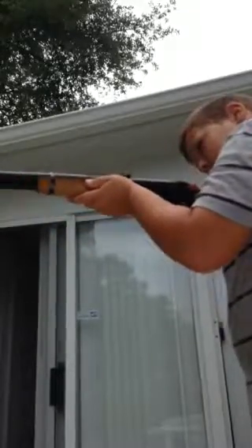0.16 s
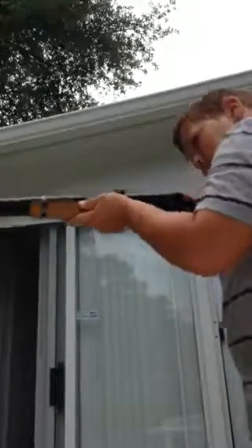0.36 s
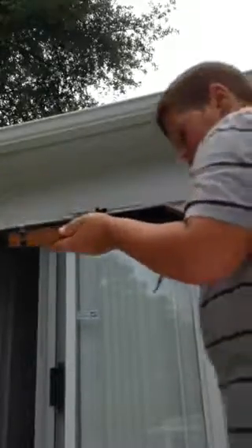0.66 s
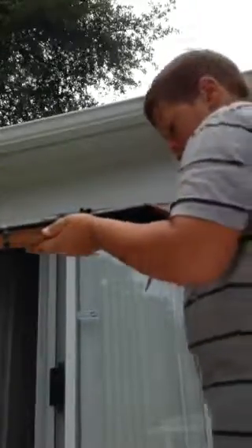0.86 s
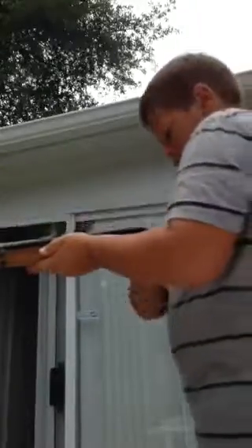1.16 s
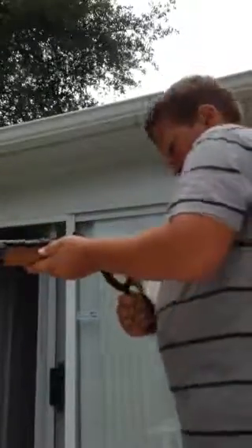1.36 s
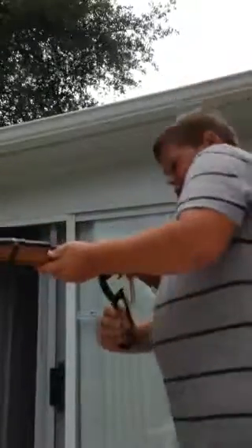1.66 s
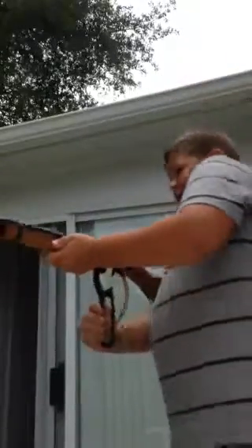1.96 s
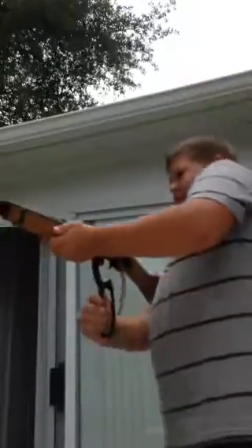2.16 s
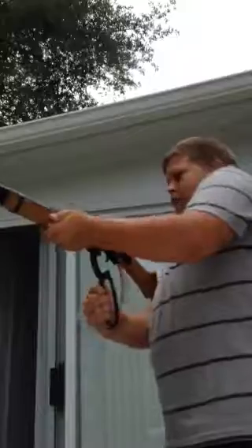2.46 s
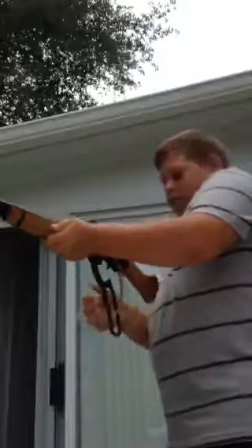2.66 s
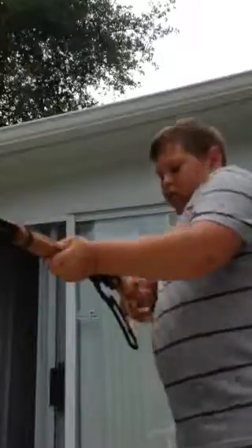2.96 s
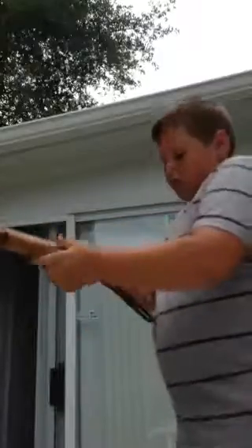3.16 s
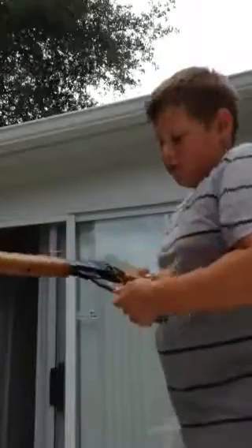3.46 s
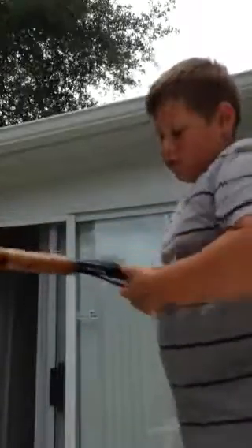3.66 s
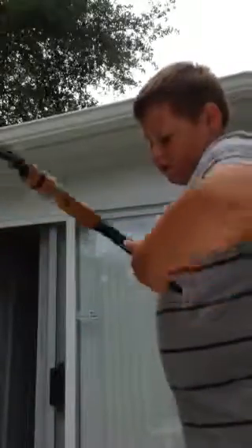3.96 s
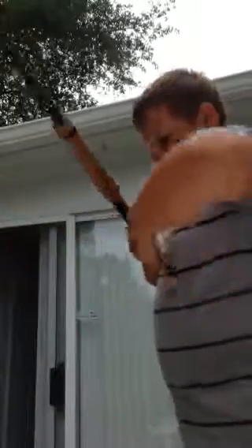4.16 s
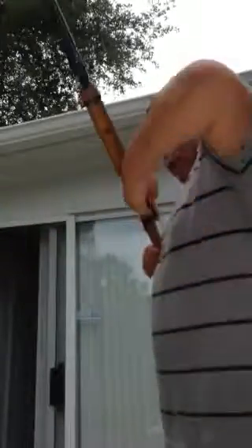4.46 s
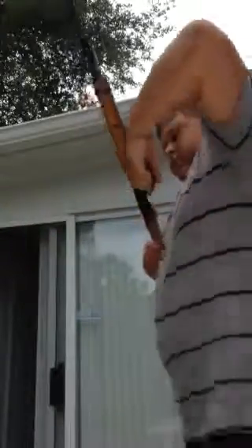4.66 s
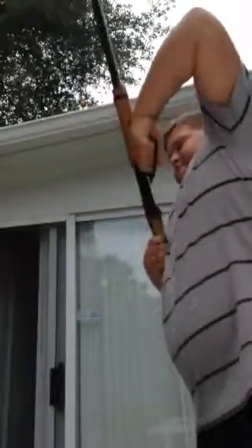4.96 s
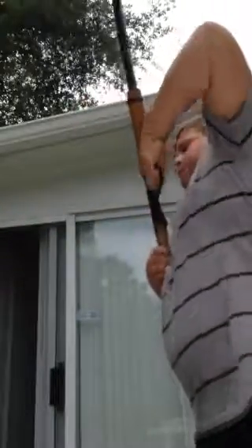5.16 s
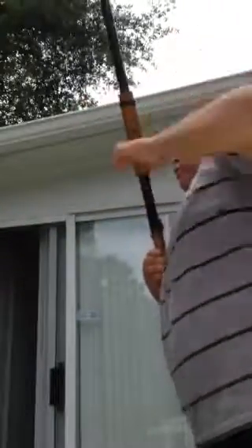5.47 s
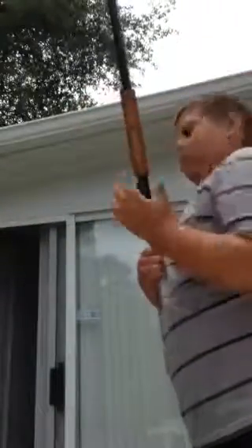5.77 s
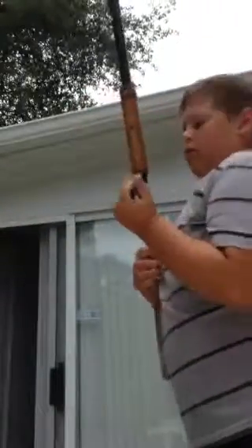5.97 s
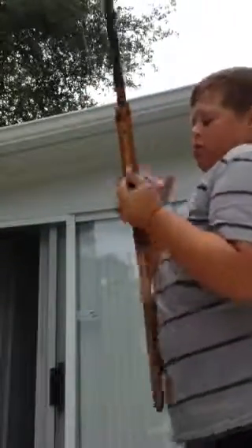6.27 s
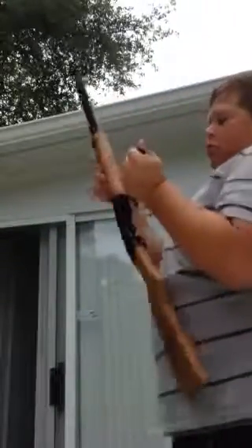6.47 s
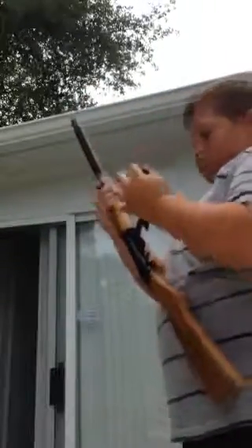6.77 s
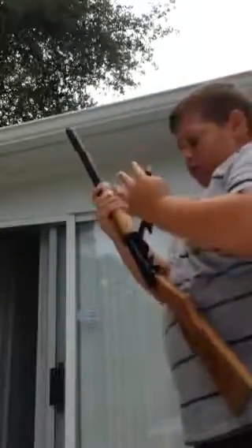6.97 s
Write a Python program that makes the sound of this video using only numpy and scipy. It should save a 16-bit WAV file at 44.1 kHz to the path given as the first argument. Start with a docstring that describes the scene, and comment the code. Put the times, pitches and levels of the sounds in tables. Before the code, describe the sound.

A BB rifle is handled close to the microphone beside a house wall. Small pellets tick and trickle, then a hard double steel crack and another follow. After a quieter spell come a bright rattle, a knock, then three strong clacks amid rushing pellets. Light ticks and handling knocks finish. Short wall echoes follow; faint air, low hum, insects and a far bird lie beneath.

```python
"""Sharp cracks come from the spring action of a lever-action BB rifle, worked and fired beside a house wall.
Each crack is a burst of steel chatter that rings the gun's modes and bounces once.
Loose BBs roll and tick in the steel barrel tube as streams of small hits; lever and hands knock on the stock.
Wall and eaves throw the gun's sounds back as fading noise echoes.
Behind it are filtered noise for air, a humming machine and insects, and gliding tones for a far bird."""
import sys
import numpy as np
from scipy import signal
from scipy.fft import rfft, irfft
from scipy.io import wavfile

SR = 44100
rng = np.random.default_rng(int(sys.argv[2]) if len(sys.argv) > 2 else 0)


def log_audio(samples):
    """Write samples as a 16-bit WAV file to the path given in sys.argv[1]."""
    # one column per channel
    frames = np.atleast_2d(samples).T
    # limit to full scale, then quantise
    limited = np.clip(frames, -1, 1)
    pcm = np.round(limited * 32767).astype(np.int16)
    wavfile.write(sys.argv[1], SR, pcm)


N = 313992
TIME = np.arange(N) / SR  # seconds

# Bouts of rolling, each with the tube resonances that the pile of BBs leaves free.
# Each row: start in seconds, end in seconds, basic hits per second,
# lower resonance in Hz, its boost in dB, upper resonance in Hz, its boost in dB.
BOUTS = [(.5, 1.597, 5100, 4430, 5.5, 12060, 8.5), (1.6, 3.1, 3900, 3650, 2.5, 11500, -2.5),
         (3.11, 3.99, 2700, 3370, 10, 6860, 6), (4, 5.0, 3400, 7000, 1.5, 11700, 4),
         (5.0, 6.003, 2200, 2680, -0.5, 7040, 1.5), (5.997, 7.203, 1400, 2450, -2.5, 5960, 5)]
# The colour of a BB's hit. Each row: frequency in Hz, relative level in dB.
BALL = [(300, -37), (1500, -45), (2600, -24), (3600, -7), (5500, -0.5), (8000, 0.5), (10000, 3.5),
        (12200, 10), (15500, 5.5)]


def amp(db):
    """Turns decibels into a gain."""
    return 10 ** (np.asarray(db) / 20)


def unit(x):
    """Scales a signal to an rms (average strength) of 1."""
    return x / np.sqrt(np.mean(abs(x) ** 2) + 1e-20)


def read(points, hz):
    """Reads a curve between its points, along a log-frequency axis."""
    f, value = np.transpose(points)
    return np.interp(np.log(hz + 1), np.log(f), value)


def add(mix, s, sound):
    """Mixes a sound in, starting s seconds into the mix."""
    part = mix[round(s * SR):][:len(sound)]
    part += sound[:len(part)]


def bins(size=2048):
    """Lists the frequencies of a short spectrum, moved up 1 Hz to avoid zero."""
    return np.fft.rfftfreq(size, 1 / SR) + 1


def hump(centre_hz, octaves):
    """Makes a bell-shaped bump over log frequency, with a peak of 1."""
    distance = np.log2(bins() / centre_hz) / octaves
    return np.exp(-.5 * distance ** 2)


def ring(gain):
    """Turns a spectrum into a ringing of energy 1 that starts at once and never before the blow."""
    cepstrum = irfft(np.log(np.maximum(gain / gain.max(), 1e-5)))
    # folding the cepstrum forward in time gives the minimum-phase response
    half = len(cepstrum) // 2
    cepstrum[1:half] *= 2
    cepstrum[half + 1:] = 0
    response = irfft(np.exp(rfft(cepstrum)))
    return response / np.linalg.norm(response)


def coloured(x, points):
    """Filters a sound by a spectrum given in dB."""
    gain = amp(read(points, bins()))
    return signal.fftconvolve(x, ring(gain) * np.sqrt(np.mean(gain ** 2)))


def noise(gain_at):
    """Makes noise of rms 1 with the given spectrum."""
    spectrum = rfft(rng.standard_normal(N))
    return unit(irfft(spectrum * gain_at(np.fft.rfftfreq(N, 1 / SR)), N))


def cracks(gain_db=12.0, focus_db=7, dead_db=10, fade_ms=1.0, rebound_db=-7, jolt_db=-29):
    """The spring slams steel parts together; where a blow lands, some modes ring and others stay dead."""
    # Each row: time in seconds, level in dB before the common gain, metal contact in ms, rebound delay in ms,
    # lower ring in Hz, upper ring in Hz, dead band in Hz, stock thump in dB, tilt in dB per octave.
    crack_rows = [(1.663, -22, 0.26, 0.46, 4400, 12600, 2400, -27, 10),
                  (1.678, -12.5, 4.1, 1.1, 4250, 5200, 2200, -11, 0.5),
                  (2.0044, -11.5, 2.53, 1.17, 3900, 6000, 2620, -20, 0.5),
                  (4.358, -8.5, 3.2, 0.96, 4370, 6600, 2230, -5, 0),
                  (4.595, -7, 1.4, 1.31, 3330, 12300, 5500, 2.5, 2.5),
                  (4.8416, -9, 2.87, 1.14, 3164, 6260, 5550, 9.5, 3)]
    out = np.zeros(N)
    for s, db, contact_ms, rebound_ms, lower_hz, upper_hz, dead_hz, thump_db, tilt_db in crack_rows:
        place_db = focus_db * (hump(lower_hz, .14) + hump(upper_hz, .12)) - dead_db * hump(dead_hz, .13)
        octaves_up = np.log2(np.maximum(bins(), 800) / 4000)
        colour_db = place_db + thump_db * hump(854, 0.15) + tilt_db * octaves_up
        jolt = amp(jolt_db) * hump(460, 0.79) * amp(thump_db / 2)  # the whole gun jolts
        body = ring(rifle() * amp(colour_db) + jolt)
        blow = amp(db + gain_db) * signal.fftconvolve(chatter(contact_ms, fade_ms), body)
        add(out, s, blow)
        # the part bounces once, which combs the spectrum
        add(out, s + rebound_ms / 1e3, amp(rebound_db) * blow)
    return out


def chatter(contact_ms, fade_ms, size=2048, count=14):
    """Steel chatters on steel: a short, fading random force of energy 1 with a nearly even spectrum."""
    ms = np.arange(size) * 1e3 / SR
    envelope = np.exp(-np.maximum(ms - contact_ms, 0) / fade_ms)
    force = rng.standard_normal(size) * envelope
    # shorten the force and even out its spectrum by turns
    for _ in range(count):
        spectrum = rfft(force * np.sqrt(envelope))
        force = irfft(spectrum / (abs(spectrum) + 1e-9))
    force *= np.sqrt(np.sqrt(envelope))
    return force / np.linalg.norm(force)


def rifle():
    """The gun answers a blow most strongly at its modes, whose powers add up."""
    # The gun's modes. Each row: frequency in Hz, width in Hz, relative level in dB.
    modes = [(775, 136, 3.5), (1210, 300, -2), (1660, 550, -10.5), (2315, 515, 10.5), (3010, 350, 2.5),
             (3290, 270, -3.5), (3900, 880, -1), (4870, 1050, -2), (6950, 1100, 0), (7940, 1200, -1.5),
             (9430, 230, 2), (10300, 770, -3), (11300, 410, -6), (13230, 1030, -2.5), (15500, 800, -3.5)]
    f = bins()
    power = 0
    for hz, width, db in modes:
        detuning = (f * f - hz * hz) / (f * width)
        power = power + amp(db) ** 2 / (1 + detuning ** 2)
    return np.sqrt(power)


def magazine(x):
    """The BBs sound through the tube, whose resonances shift as the pile settles elsewhere."""
    out = np.zeros(N)
    for start, end, _, lower_hz, lower_db, upper_hz, upper_db in BOUTS:
        gain = amp(lower_db * hump(lower_hz, 0.22) + upper_db * hump(upper_hz, 0.043))
        tube = ring(gain) * np.sqrt(np.mean(gain ** 2))
        bout = x[round(start * SR):round(end * SR)]
        add(out, start, signal.fftconvolve(bout, tube))
    return out


def rolling(clatter_db=-2.0, rumble_db=-1, rumble_density=2.7):
    """Loose BBs run along the tube, hitting one another and setting its wall ringing."""
    # The colour of the ringing tube wall. Each row: frequency in Hz, relative level in dB.
    tube_colour = [(200, -21), (750, 1), (1000, 1.5), (1350, 1), (2200, -8), (3200, 3), (5000, -0.5),
                   (15000, -9)]
    surge_db, surge_hz = 1.6, 45.4  # the pile moves in uneven surges
    surge = surge_db * noise(lambda f: np.exp(-(f / surge_hz) ** 2))
    clatter, rumble = slide_level() + surge
    start, _, per_s = np.transpose(BOUTS)[:3]
    per_s = per_s[np.searchsorted(start, TIME) - 1]  # hit rate of the bout under way
    balls = collisions(BALL, clatter + clatter_db, per_s, size_db=-4.0, ringing=1.0)
    wall = collisions(tube_colour, rumble + rumble_db, rumble_density * per_s, size_db=3, ringing=1.7)
    return balls + wall + strays(clatter)


def slide_level():
    """The pile slides when the gun tilts or is jerked; clatter and rumble (in dB) swell, run and settle."""
    # Each row: time of full speed in seconds, speeding up in seconds, running in seconds,
    # clatter in dB before later gains, rumble of the tube relative to the clatter in dB.
    slide_rows = [(.678, 0.013, .006, -62, -35), (.962, 0.021, 0.034, -52, -19),
                  (1.057, 0.035, 0.1, -47, -18.5), (1.19, .05, .04, -64, -5),
                  (2.432, 0.071, 0.0096, -53.5, -28), (2.514, 0.026, 0.039, -53, -32),
                  (2.625, 0.065, 0.047, -54, -33), (3.277, 0.013, 0.063, -38, -19),
                  (3.302, .03, 0.0073, -33.5, -16.5), (3.436, 0.013, 0.011, -61, -12),
                  (4.305, 0.088, .17, -39, -18), (4.551, 0.18, 0.072, -32.5, -16),
                  (4.644, 0.14, 0.036, -33, -12.5), (5.128, 0.045, 0.0071, -45, -9.5),
                  (5.238, 0.021, 0.0043, -53.5, -8), (6.446, 0.092, 0.0035, -47.5, -6.5),
                  (6.513, 0.02, 0.025, -48, -11.5), (6.596, 0.038, 0.0053, -47.5, -4),
                  (6.695, 0.023, 0.099, -62.5, -1)]
    speed_up_db, settle_db_per_s = 19.5, 314
    clatter = rumble = amp(-120.)
    for s, rise_s, run_s, db, below_db in slide_rows:
        speeding = speed_up_db * np.maximum(s - TIME, 0) / rise_s
        settling = settle_db_per_s * np.maximum(TIME - s - run_s, 0)
        level = amp(np.maximum(db - speeding - settling, -200))
        # the strongest slide at each moment counts
        clatter = np.maximum(clatter, level)
        rumble = np.maximum(rumble, level * amp(below_db))
    return 20 * np.log10(clatter), 20 * np.log10(rumble)


def collisions(colour, level_db, per_s, size_db, ringing, count=16):
    """Balls hit in a random stream: the more of them move, the louder and denser it is."""
    rate = per_s * amp(.6 * np.clip(level_db + 36, -30, 6))
    size = unit(amp(size_db * np.minimum(rng.exponential(1, N), 2.5)))
    struck = rng.random(N) < rate / SR
    # sparser hits are made larger, so that level_db alone sets the loudness
    hits = size * rng.choice([-1, 1], N) * struck * np.sqrt(SR / rate) * amp(level_db)
    place = rng.integers(0, count, N)  # each hit lands at one of a few places
    out = np.zeros(N)
    for k in range(count):
        out += signal.oaconvolve(hits * (place == k), contact(colour, ringing))[:N]
    return out


def contact(colour, ringing, count=24):
    """One ball hits the gun; where it lands decides which modes it rings."""
    place_db = 3 * np.interp(bins(), np.linspace(0, SR / 2, count), rng.standard_normal(count))
    return ring(rifle() ** ringing * amp(read(colour, bins()) + place_db))


def strays(clatter_db, follow=0.73, spread_db=3, resting_db=-72):
    """Lone balls tick while the pile moves; they fade less than the clatter, so stand out at a slide's ends."""
    strays_per_s, stray_db = 75, 2.5
    out = np.zeros(N)
    happens = (rng.random(N) < strays_per_s / SR) & (clatter_db > resting_db)
    for at in np.flatnonzero(happens):
        size = amp(stray_db + follow * clatter_db[at] + spread_db * rng.standard_normal())
        force = chatter(contact_ms=1.2, fade_ms=0.45)
        add(out, at / SR, size * signal.fftconvolve(force, contact(BALL, ringing=1.0)))
    return out


def ticks(gain_db=9.5):
    """The loudest single BBs and latch parts tick hard, and each lands once more, softer."""
    # Each row: time in seconds, level in dB before the common gain.
    tick_rows = [(0.6624, -27.5), (0.6784, -33.5), (0.7726, -31.5), (0.9403, -41.5), (0.9677, -33.5),
                 (1.0271, -33), (1.0395, -31), (1.0505, -23.5), (1.1434, -35), (1.2047, -34), (1.2241, -41),
                 (2.4309, -32.5), (2.4414, -32.5), (2.5112, -35.5), (2.6165, -31.5), (2.9522, -40.5),
                 (3.1712, -39.5), (3.3037, -24), (3.3348, -21.5), (4.2058, -37), (4.2198, -30),
                 (4.2453, -26), (4.2632, -24.5), (4.2911, -23.5), (5.0848, -37.5), (5.1282, -28.5),
                 (5.2081, -40), (5.2355, -28), (5.656, -36.5), (6.3589, -35.5), (6.4458, -29.5),
                 (6.4916, -36), (6.5126, -29.5), (6.7555, -36), (6.7654, -32.5), (7.0145, -36)]
    bounce_s, bounce_db = .015, -19.5  # the delay varies at random around this
    out = np.zeros(N)
    for s, db in tick_rows:
        force = chatter(contact_ms=2.1, fade_ms=0.72)
        tick = amp(db + gain_db) * signal.fftconvolve(force, contact(BALL, ringing=0.74))
        add(out, s, tick)
        add(out, s + bounce_s * rng.uniform(0.81, 1.7), amp(bounce_db) * tick)
    return out


def knocks(gain_db=16, focus_db=19):
    """Lever and hands knock on the gun: softer blows that ring it around one pitch and less above that."""
    # Each row: time in seconds, level in dB before the common gain, centre in Hz, breadth in octaves.
    knock_rows = [(1.072, -49, 1090, 0.51), (1.112, -37.5, 4180, 0.45), (1.115, -40.5, 1000, 0.39),
                  (2.251, -55.5, 2700, .6), (3.602, -50, 1050, 0.35), (3.698, -33.5, 920, 0.77),
                  (5.545, -53, 2420, 1), (6.101, -47.5, 2790, 1), (6.388, -46.5, 2274, 0.92),
                  (6.402, -48.5, 758, 0.25), (6.597, -40, 1150, 0.18), (6.771, -44.5, 2700, 0.96),
                  (6.855, -48, 2840, 1), (6.936, -54.5, 2230, 0.6), (7.014, -38.5, 1800, 0.78)]
    # What stands out when stock and lever are knocked. Each row: frequency in Hz, breadth in octaves, boost in dB.
    stock_rows = [(1250, 0.12, 3), (3040, 0.017, 3), (3380, 0.087, 1), (4100, 0.083, 12.5)]
    stock_db = sum(db * hump(hz, octaves) for hz, octaves, db in stock_rows)
    out = np.zeros(N)
    for s, db, hz, octaves in knock_rows:
        dulling_db = 2.0 * np.log2(np.maximum(bins() / hz, 1))
        body = ring(rifle() * amp(stock_db + focus_db * hump(hz, octaves) - dulling_db))
        force = chatter(contact_ms=1.2, fade_ms=2.2)
        add(out, s, amp(db + gain_db) * signal.fftconvolve(force, body))
    return out


def surroundings(x, wall_db, wall_s, wall_t60, yard_db):
    """Wall, eaves and ground answer with a short burst of echoes; the yard adds a faint, longer tail."""
    # Colour of the reflections off wall and eaves. Each row: frequency in Hz, level in dB.
    wall_colour = [(150, 13), (700, -5), (1100, 0), (1450, 2.5), (1800, 0), (2200, 5), (2900, -7.5),
                   (4000, -5), (6000, -6), (10000, -6), (15000, -6.5)]
    # Colour of the far tail. Each row: frequency in Hz, level in dB.
    yard_colour = [(150, 5), (750, -7), (2500, -3.5), (5000, -7), (10000, -2.5), (15000, -17)]
    # How long the tail takes to fall by 60 dB. Each row: frequency in Hz, time in seconds.
    yard_t60 = [(200, 0.74), (2500, 0.54), (7000, 0.4), (15000, 0.44)]
    t = np.arange(SR // 2) / SR
    fade = amp(-60 * np.maximum(t - wall_s, 0) / wall_t60)
    early = rng.standard_normal(len(t)) * np.minimum(t / wall_s, 1) ** 0.11 * fade
    # the tail grows over 33 ms, and each pitch dies at its own pace
    growing = rng.standard_normal(len(t)) * np.minimum(t / 0.033, 1)
    hz, frame_s, z = signal.stft(growing, SR, nperseg=256)
    decay = amp(-60 * frame_s / read(yard_t60, hz)[:, None])
    late = signal.istft(z * decay, SR, nperseg=256)[1][:len(t)]
    wall = amp(wall_db) * coloured(early / np.linalg.norm(early), wall_colour)
    yard = amp(yard_db) * coloured(late / np.linalg.norm(late), yard_colour)
    return signal.fftconvolve(x, wall + yard)[:N]


def background(air_db=-61.5):
    """Outdoor air, a humming machine and a slowly swelling drone of insects, all as filtered noise."""
    # The spectrum of the outdoor air. Each row: frequency in Hz, relative level in dB per Hz.
    air_colour = [(20, -39), (34, -8), (122, -4), (183, -10.5), (354, -18.5), (383, -16), (413, -14),
                  (506, -18.5), (670, -18), (1440, -24.5), (5280, -28.5), (7350, -29.5), (15000, -33.5)]
    # Steady hum and insects. Each row: frequency in Hz, width in Hz, level in dB before any swell.
    drone_rows = [(74.7, 11.6, -67), (118.9, 7.4, -67.5), (2462, 56, -85.5), (3320, 69, -86),
                  (4970, 2000, -78)]
    # The swell of the insects. Each row: time in seconds, boost in dB.
    swell_points = [(0, 4.5), (1.5, 6.5), (3.5, 6), (5.5, 3), (7.1, 3)]
    out = amp(air_db) * noise(lambda f: amp(read(air_colour, f)))
    swell = amp(np.interp(TIME, *np.transpose(swell_points)))
    for hz, width, db in drone_rows:
        band = noise(lambda f: 1 / (1 + ((f - hz) / width * 2) ** 2))
        out += amp(db) * band * (swell if hz > 1000 else 1)  # only the insects swell
    return out


def birds(blur_hz=45, gain_db=0.5, quaver=0.0083, quaver_hz=70):
    """A distant bird's falling whistles: gliding pure tones that swell, waver a little and fade."""
    # Each row: start in seconds, length in seconds, start pitch in Hz, end pitch in Hz,
    # level in dB before the common gain.
    whistle_rows = [(1.221, 0.3, 3520, 3140, -66.5), (2.75, .07, 6960, 6900, -75),
                    (3.365, 0.34, 3460, 3140, -68.5), (4.67, 0.25, 3450, 3220, -66),
                    (6.109, 0.32, 3430, 3160, -70), (6.225, 0.24, 7450, 6300, -71),
                    (6.84, 0.27, 7360, 6950, -71)]
    out = np.zeros(N)
    for s, length, start_hz, end_hz, db in whistle_rows:
        glide = np.geomspace(start_hz, end_hz, round(length * SR))
        wobble = noise(lambda f: np.exp(-(f / quaver_hz) ** 2))[:len(glide)]
        hz = glide * (1 + quaver * wobble)
        tone = np.sin(2 * np.pi * np.cumsum(hz) / SR)
        add(out, s, amp(db + gain_db) * tone * signal.windows.tukey(len(hz), .6))
    waver = noise(lambda f: np.exp(-(f / blur_hz) ** 2))
    return out * amp(3 * waver)  # the loudness wavers by about 3 dB


def scene():
    """Mixes the gun close by, its echoes, and the garden."""
    gun = cracks() + knocks() + magazine(ticks() + rolling())
    echoes = surroundings(gun, wall_db=-3.5, wall_s=0.01, wall_t60=0.078, yard_db=-18)
    return (gun + echoes + background() + birds())[None]


def record(dry):
    """The recorder's band limit removes the highest treble."""
    edge_hz = 15380
    lowpass = signal.firwin(511, edge_hz, window=("kaiser", 9), fs=SR)
    return signal.oaconvolve(dry, lowpass[None], "same")


dry = scene()
out = record(dry)
log_audio(out)
```